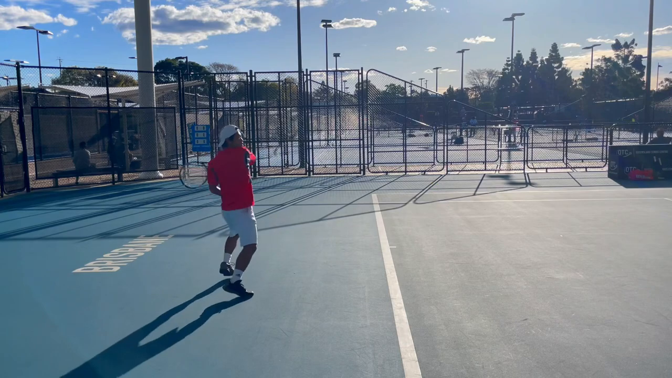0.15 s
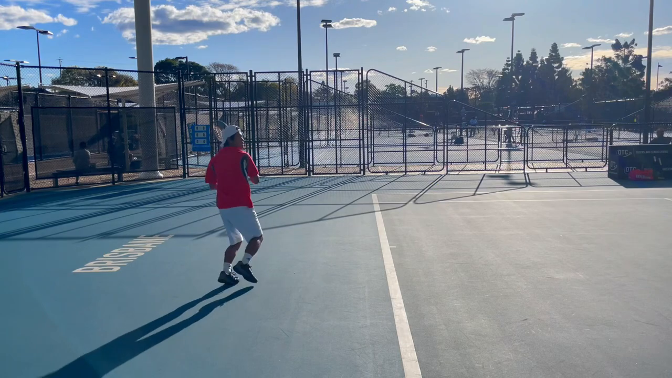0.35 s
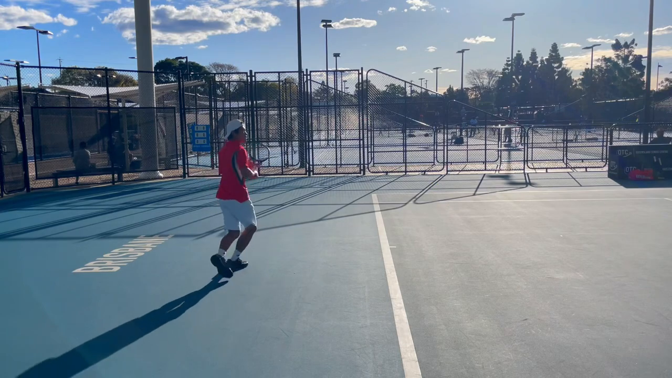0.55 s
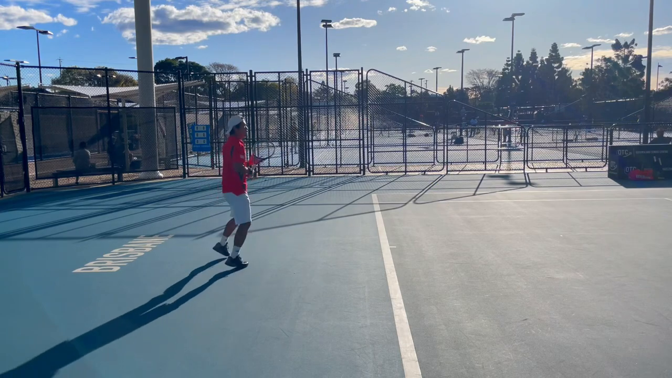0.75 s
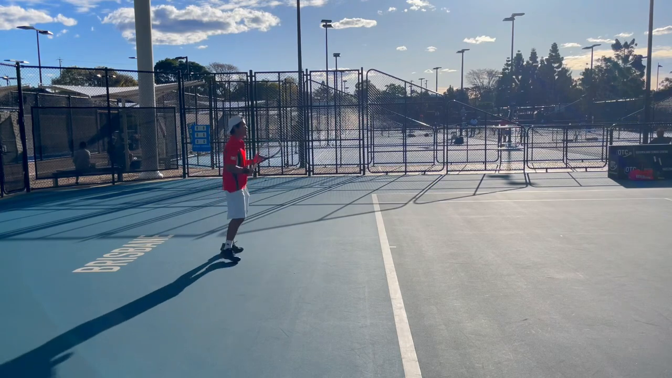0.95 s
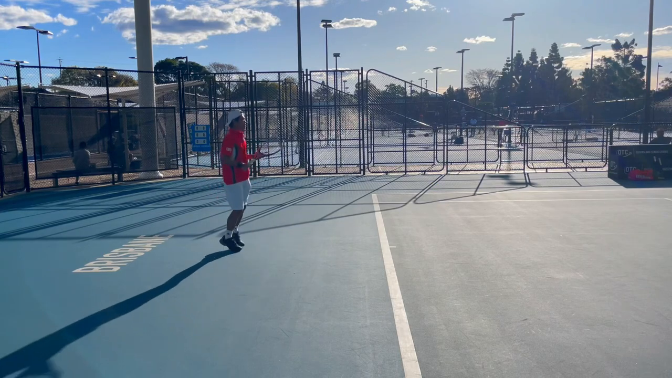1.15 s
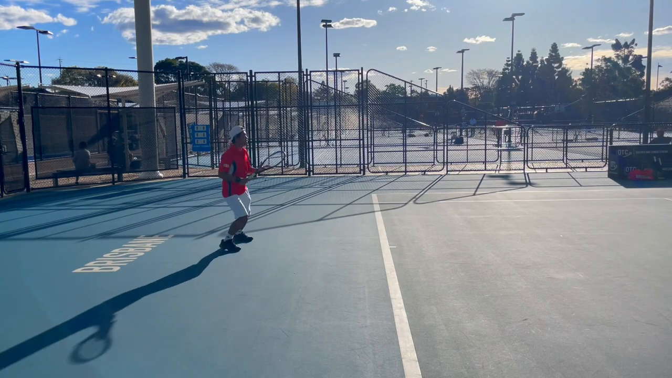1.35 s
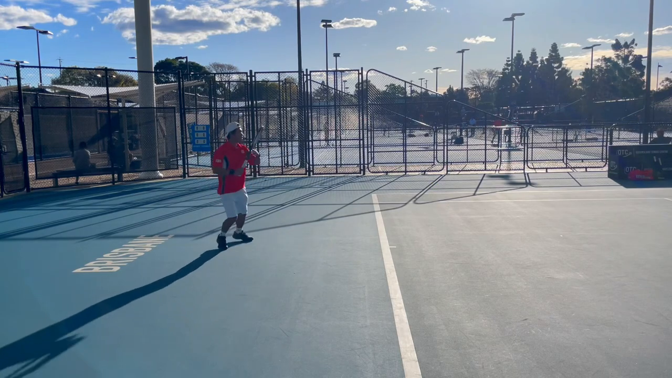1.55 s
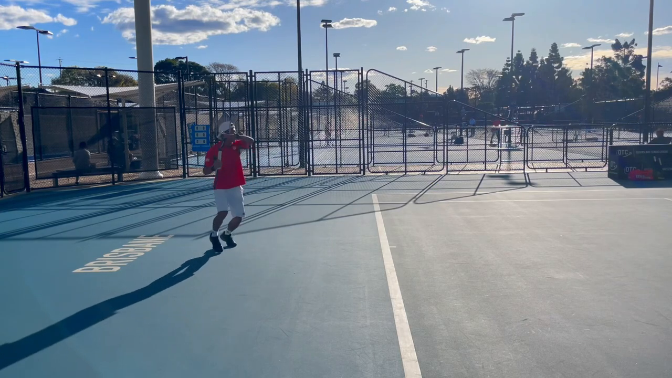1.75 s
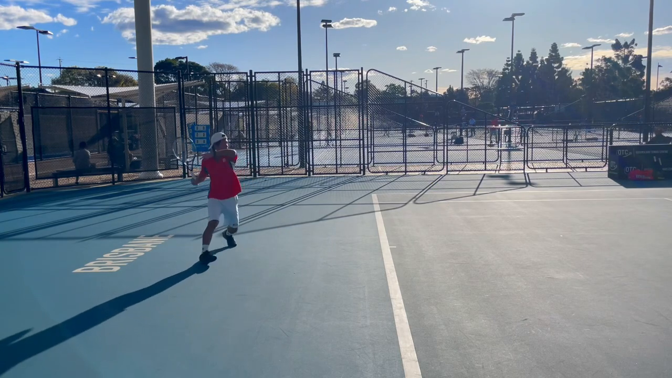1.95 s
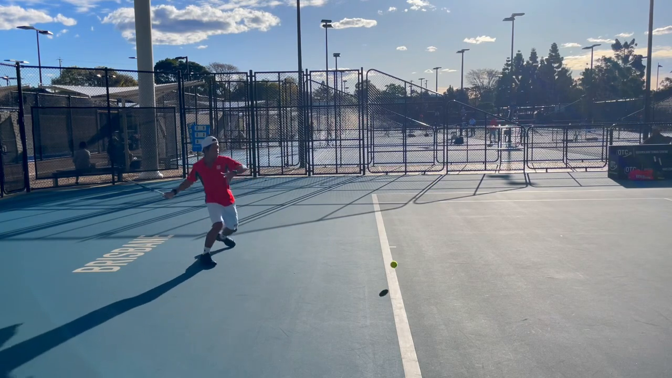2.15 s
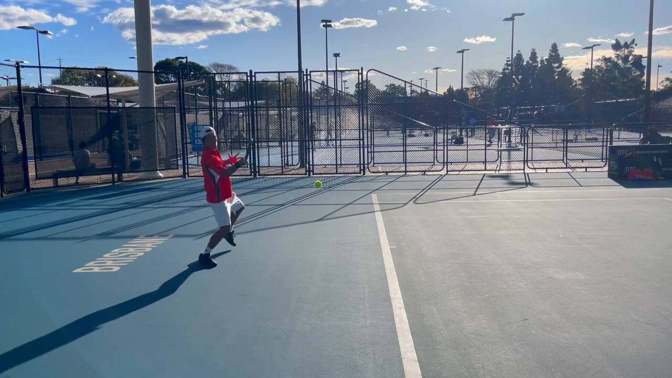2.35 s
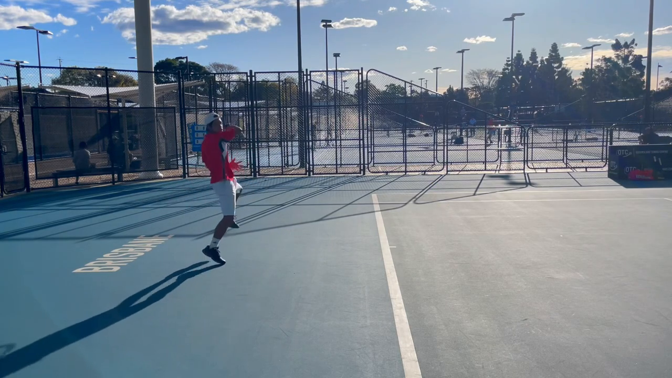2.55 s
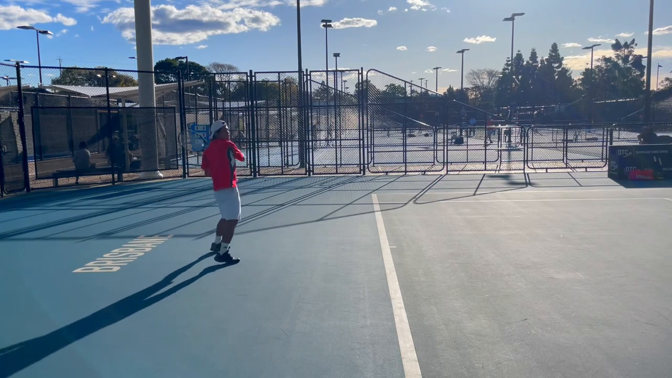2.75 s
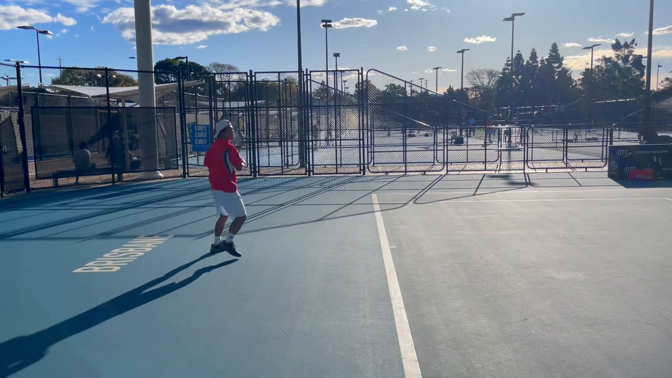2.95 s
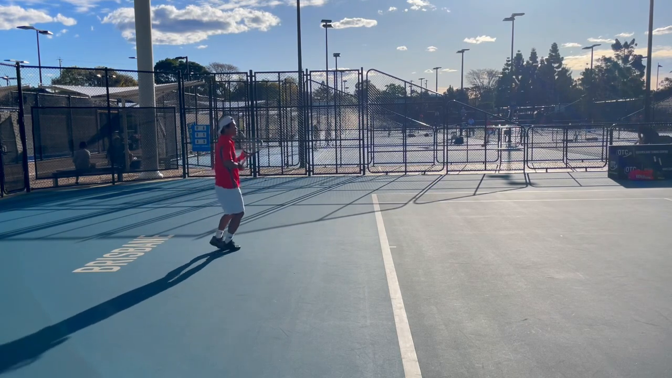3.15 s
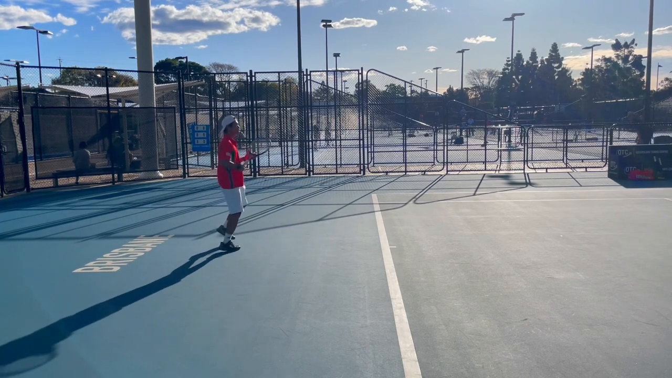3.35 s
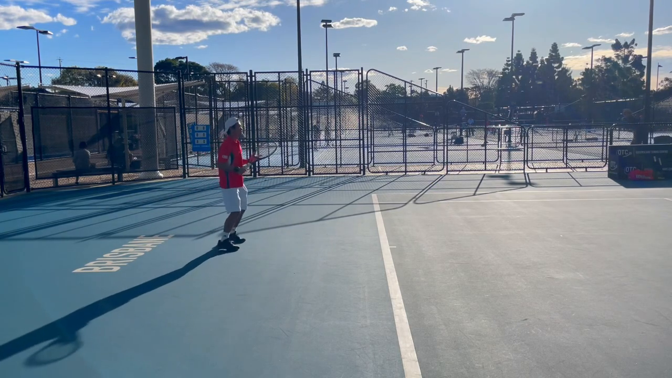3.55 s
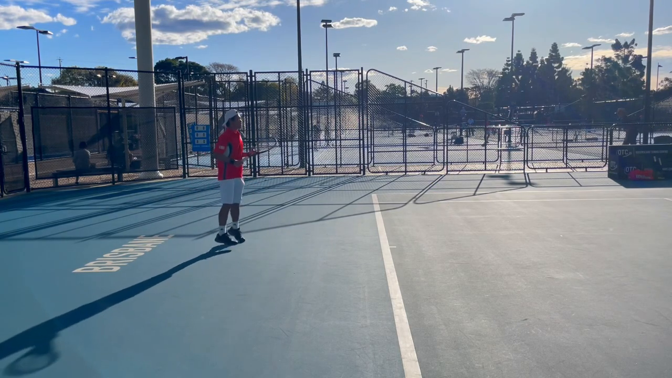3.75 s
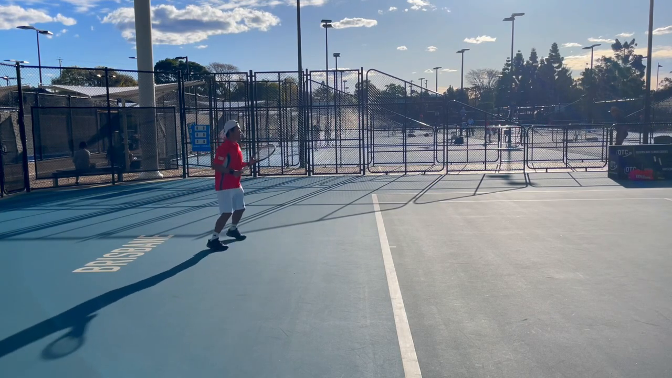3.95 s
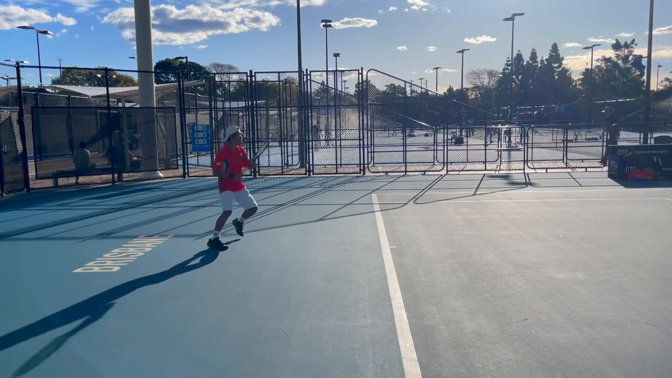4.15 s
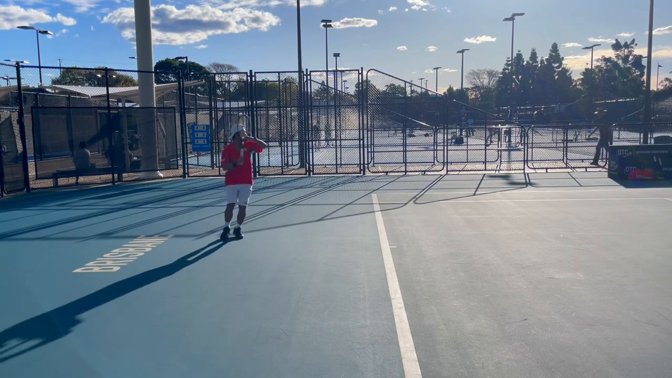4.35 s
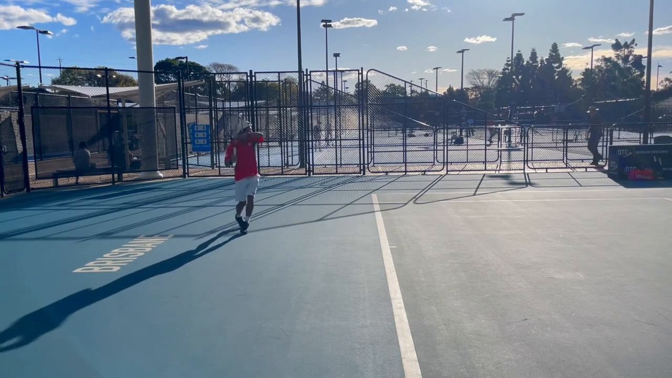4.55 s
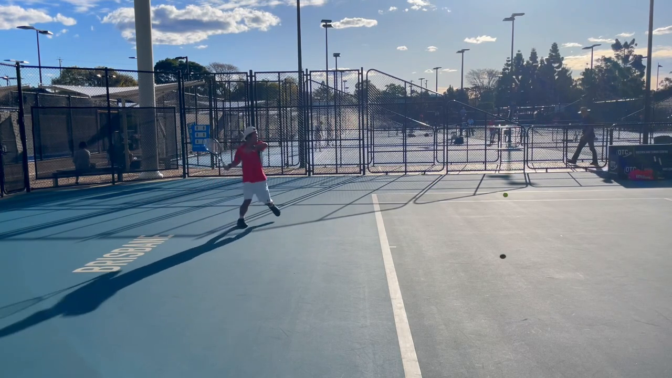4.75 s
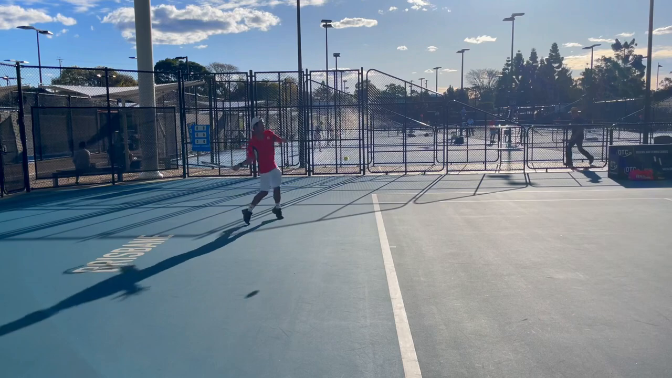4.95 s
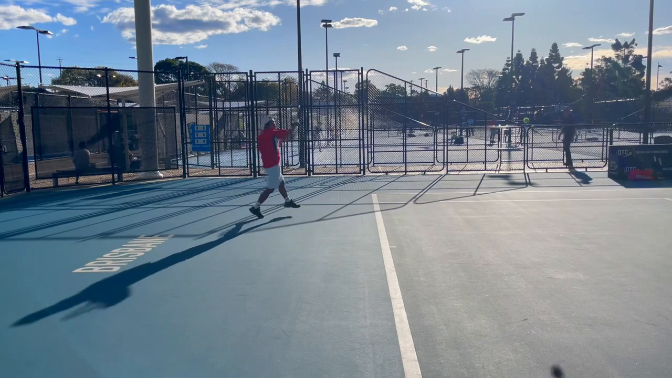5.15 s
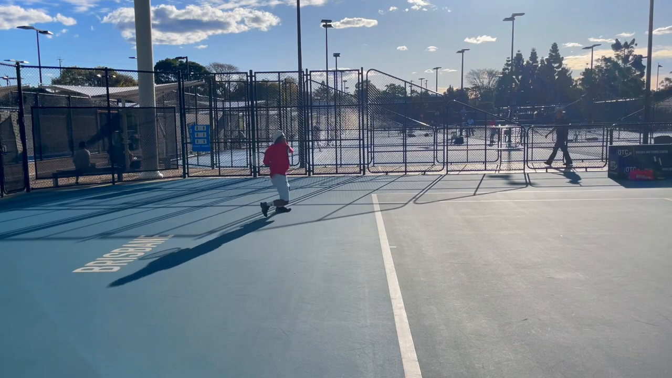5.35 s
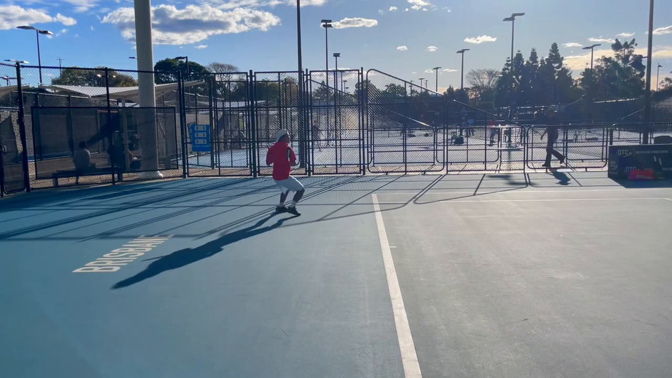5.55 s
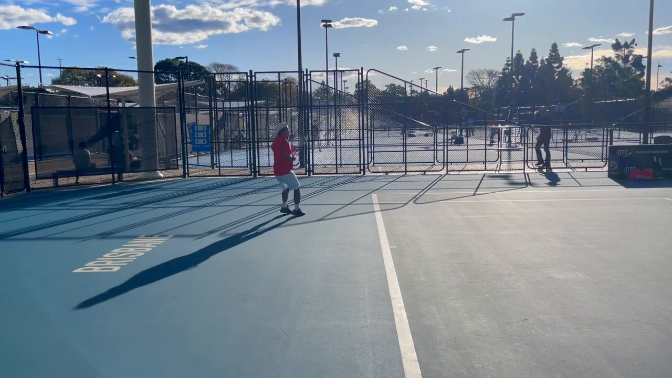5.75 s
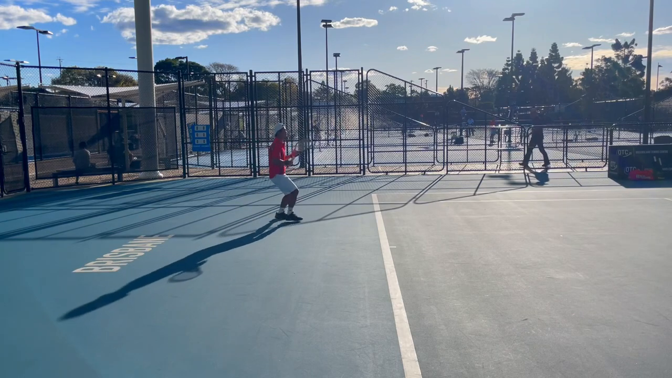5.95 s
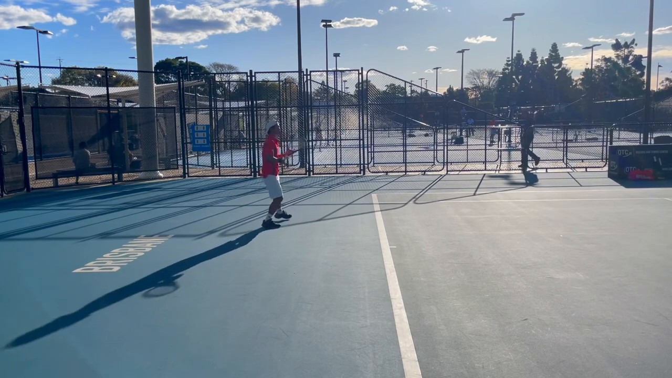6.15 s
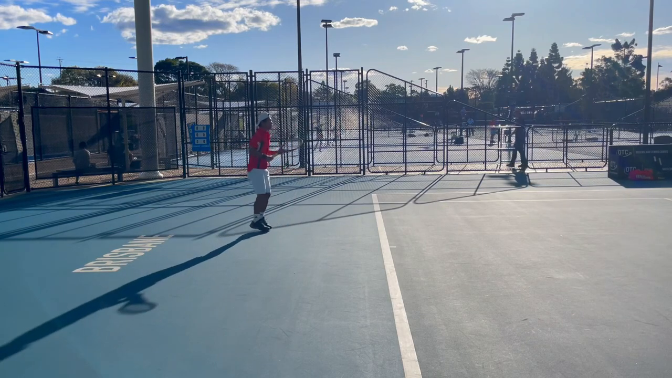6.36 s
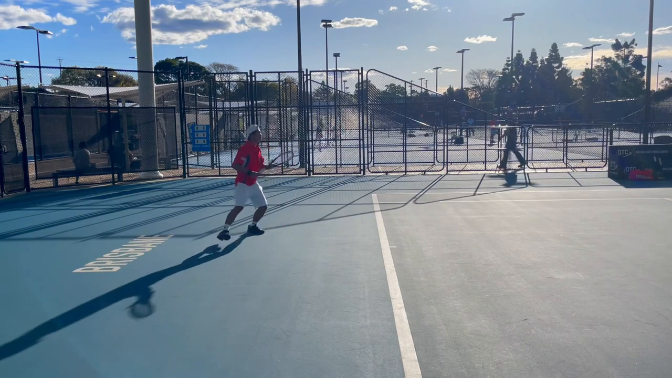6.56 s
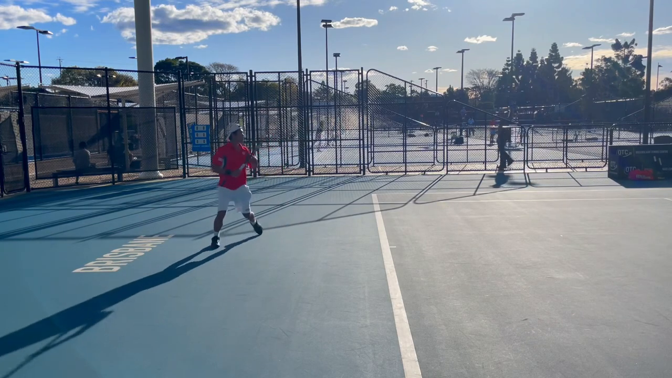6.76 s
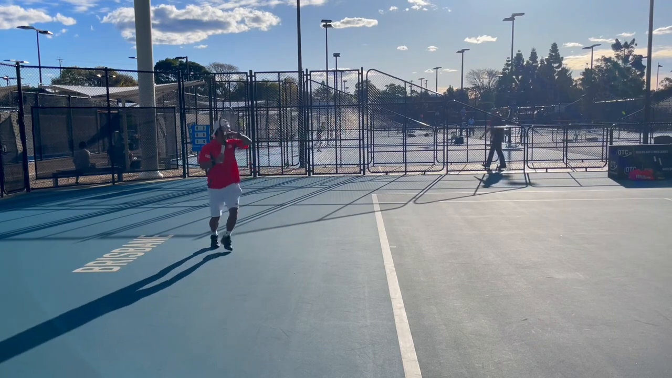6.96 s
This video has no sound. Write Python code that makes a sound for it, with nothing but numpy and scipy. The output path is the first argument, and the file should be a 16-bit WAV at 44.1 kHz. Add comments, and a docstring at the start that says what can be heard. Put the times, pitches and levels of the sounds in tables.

```python
"""First heard: echoes and tail of a near stroke made just before the start, over a low traffic rumble.
A tennis rally on an outdoor hard court follows, heard from a phone behind the near baseline.
Strokes are damped modes of ball and strings with a noise rasp; copies glance off the ground, slap back
from the structures around and linger in a diffuse noise tail. Bounces ring a hollow ball.
The near player's shoes thump (modes), scuff (grainy noise) and squeak (unsteady tones)."""
import sys
import numpy as np
from scipy import signal
from scipy.fft import rfft, irfft, next_fast_len
from scipy.io import wavfile

SR = 44100
rng = np.random.default_rng(int(sys.argv[2]) if len(sys.argv) > 2 else 0)


def dump(signal):
    """Clip the signal to [-1, 1] and save it as 16-bit WAV at the path in sys.argv[1]."""
    limited = np.clip(np.atleast_2d(signal).T, -1, 1)
    pcm = np.round(limited * 32767).astype(np.int16)
    wavfile.write(sys.argv[1], SR, pcm)


N = 309018
LEAD = SR // 2  # samples computed ahead of the start, for events that begin before it
TOTAL = N + LEAD

# Racket strokes. Each row: start in seconds, level in dB, ring pitch ratio, string ping in dB, ping in Hz,
# ping T60 in seconds, player's step away from the fence in m, share thrown to the surroundings in dB, court end.
STROKE_ROWS = [(-.222, -6, 1.0, -30, 2900, .02, 0.03, 0, "near"),
               (1.1422, -14, 1.05, -.5, 2850, .011, -0.05, 1.5, "far"),
               (2.3606, -6.3, 0.98, -24, 2950, .012, .6, -1.8, "near"),
               (3.8015, -14, 1.075, -27, 2170, .15, 0.016, 1, "far"),
               (5.1001, -6.5, 1.0, -25, 2550, .02, -.35, 1, "near"),
               (6.3568, -17.5, 1.09, -30, 2900, .015, -0.03, 3.5, "far")]
# Ball on each player's string bed. Each row: mode in Hz, level in dB, T60 in seconds.
NEAR_RACKET_MODES = [(185, 2.3, .0148), (630, -1, .016), (801, -2, .029), (990, -5.5, .04),
                     (1545, -9, .028), (1740, -16, .02), (2520, -18, .018), (3150, -17, .008),
                     (3900, -24, .01), (5400, -25, .008)]
FAR_RACKET_MODES = [(262, 4, 0.014), (450, -3.5, 0.014), (796, -2, 0.026), (990, 1.5, 0.012),
                    (1550, -7, 0.011), (1900, -8, 0.0054), (2465, -16, 0.0088)]
# Stroke by court end. Each entry: string rasp in dB, contact swell in seconds, direct treble shelf in dB,
# shelf corner in Hz, echo in dB, tail in dB.
STROKE_BY_END = {"near": (-17, .00082, 3, 1000, 0.4, -1), "far": (-15.5, .00063, -5.5, 650, -1.86, 6)}
# Delay of the reflection off the court behind the direct sound, by court end, in ms.
GROUND_DELAY_MS = {"near": 3.66, "far": 2.9}
# Lag of the left port behind the right, by court end, in ms.
LEFT_LAG_MS = {"near": -.06, "far": .36}
# Reflection off the court. Each row: frequency in Hz, gain in dB.
GROUND_GAIN = [(140, -5), (300, -1.5), (1200, -2), (4000, -9)]
# Treble lost on the way from the far end. Each row: frequency in Hz, gain in dB.
AIR_GAIN = [(4500, -1.5), (8000, -3), (13000, -14)]
# Felt rasping over strings. Each row: frequency in Hz, gain in dB.
RASP_GAIN = [(800, -2), (1600, 10.5), (3300, 1.5), (6000, -7), (8500, -5.5), (13000, -12), (16000, -18)]
# Broad knock that a near stroke throws sideways. Each row: frequency in Hz, gain in dB.
SIDEWAYS_GAIN = [(90, 5), (170, 22), (340, 32.5), (500, 29), (650, 23), (900, 24), (1150, 26), (1600, 15),
                 (2200, 15), (3000, 10.5), (6000, 0), (8500, -2), (13000, -4.5), (16000, -12)]
SIDEWAYS_RING_DB = -7  # share of the near racket's ring within that knock
SOUND_M_S = 343

# Ball bounces on this and nearby courts. Each row: start in seconds, level in dB, treble shelf in dB.
BOUNCE_ROWS = [(2.1664, -26, 10), (4.6955, -28.5, 8.5), (6.3204, -33, 15.5), (6.7622, -31.5, 9.5)]
# Hollow ball on hard ground. Each row: mode in Hz, level in dB, T60 in seconds.
BALL_MODES = [(282, 6, 0.017), (955, 2.5, 0.025), (1294, 4.5, 0.0032), (2700, 13, 0.0006)]
# Share of a bounce that the fence throws back. Each row: frequency in Hz, gain in dB.
BOUNCE_THROW_GAIN = [(250, -9), (700, -4), (1100, 3), (1700, 5), (3000, -2), (8000, -6)]
BOUNCE_TICK_DB, BOUNCE_TICK_DECAY_S = -19.5, 0.0018  # felt meeting grit, level against the knock
BOUNCE_STEP_M = 0.606  # the ball lands this much further from the fence than the player stands

# Low thumps: footfalls, and a few late echoes of strokes.
# Each row: start in seconds, thump in dB, gritty crunch in dB, thump pitch ratio.
THUMP_ROWS = [(0.225, -21, -39, 1.2), (0.275, -28, -46, 1), (1.006, -18.5, -40, 1.2), (2.17, -24, -54, .9),
              (2.267, -23, -42, 1.5), (2.603, -22, -48, 1.1), (2.745, -26, -46, 1), (2.962, -32, -48, 1),
              (3.485, -33, -43, 1.4), (5.609, -26, -49, 1), (5.698, -24, -47, 1), (6.148, -33, -45, 1),
              (6.76, -26, -52, 1)]
# Rubber sole on the court. Each row: mode in Hz, level in dB, T60 in seconds.
SOLE_MODES = [(209, 4, 0.015), (342, 1, 0.027), (607, 0, 0.011), (1357, -12, 0.03), (2605, -26, 0.065)]
# Sliding soles. Each row: start in seconds, length in seconds, hiss in dB, scrape in dB.
SCUFF_ROWS = [(.06, .09, -68, -64), (0.226, 0.022, -54, -49), (0.543, 0.0074, -54, -49.5),
              (.59, .06, -66, -62), (.858, .02, -59, -59), (.9, .05, -62, -60), (0.942, 0.066, -42, -56),
              (1.062, .016, -52, -58), (1.298, .014, -56, -54), (1.541, 0.026, -57, -60),
              (1.641, 0.047, -59.5, -53.5), (1.73, .03, -66, -62), (1.943, 0.007, -51.5, -58),
              (2.0, .09, -70, -68), (2.2, .09, -63, -62), (2.305, 0.051, -51.5, -53),
              (2.627, 0.053, -57, -52.5), (3.14, .03, -71, -62), (3.5, .02, -69, -60),
              (3.66, .03, -70, -68), (3.748, 0.0025, -50, -52), (4.07, .08, -69, -60),
              (4.339, 0.016, -53, -47), (4.37, .04, -63, -53), (4.59, .05, -64, -58),
              (4.85, .045, -72, -52), (4.932, 0.072, -48.5, -59), (5.288, .012, -58, -53),
              (5.613, 0.043, -58, -47), (5.912, .04, -65, -60), (6.1, 0.027, -51, -48),
              (6.2, .11, -67, -63), (6.455, .018, -62, -52), (6.8, 0.075, -51.5, -60)]
# Sole squeaks, and the echo of the one at 4.895 s.
# Each row: start in seconds, length in seconds, settled pitch in Hz, level in dB,
# pitch jitter as a share, sharp start as a share, tail in dB.
SQUEAK_ROWS = [(-.015, .033, 4296, -44, 0.048, .08, 1.5), (.272, .036, 4280, -51, .04, .05, -6),
               (.345, .018, 4310, -51, .03, .05, -8), (.592, .03, 3040, -46, 0.14, .08, 1),
               (0.625, .028, 2800, -46, 0.16, .08, 1), (.748, .028, 3000, -49, .12, .08, -3),
               (1.321, .03, 3290, -38.5, 0.034, .11, 2.5), (1.349, .036, 3320, -36, 0.03, .15, 1.5),
               (2.662, .018, 3250, -45, .05, .08, -10), (4.381, .014, 3450, -49, .05, .08, -8),
               (4.865, .036, 4200, -49, 0.05, .08, -3), (4.895, .02, 3350, -45, 0.01, .06, 2),
               (4.924, .034, 3365, -46, .012, .02, 3), (4.966, .02, 2700, -49, 0.03, .04, -6),
               (5.776, .033, 5130, -55, 0.05, .08, 4), (5.8, .025, 4050, -56, .07, .08, -5)]
# Relative spectra of fine grit, coarse scrape and crushed grit. Each row: frequency in Hz, gain in dB.
HISS_GAIN = [(1000, -35), (4500, -19), (7000, -7), (9000, -4), (11000, 0), (13000, .5), (14500, -1.5),
             (16000, -9)]
SCRAPE_GAIN = [(300, -2), (1500, 11), (3000, 7), (4500, 3), (7000, -2), (12000, -33)]
CRUNCH_GAIN = [(70, -32), (200, -10), (550, 0), (1100, -3), (2400, -15), (5000, -22), (8000, -36)]
CRUNCH_S = 0.012
SLIDE_RISE, SLIDE_RELEASE = 0.39, 0.42  # swell time and decay time as shares of a slide's length
# Light shuffling between the slides: mean rate, middling length and levels, level spread.
SHUFFLES_PER_S, SHUFFLE_S = 5, 0.05
SHUFFLE_HISS_DB, SHUFFLE_SCRAPE_DB, SHUFFLE_SPREAD_DB = -77, -66, 3.5
SQUEAK_SETTLE_S = 0.0055  # decay time of the sharp start
RADIATE_HZ = 110  # ball, racket and sole are too small to radiate bass below this

# Echoes of each court end and of a bounce.
# Each row: onset delay in seconds, swell time in seconds, level in dB, treble shelf in dB.
NEAR_ECHO_ROWS = [(.0295, .0145, -4.8, 0), (.052, .016, -15, -1), (.082, .017, -15, -2),
                  (.155, .025, -22, -3), (.362, .02, -18, -3), (.418, .02, -20.5, -4),
                  (.485, .022, -25, -4)]
FAR_ECHO_ROWS = [(.0205, .0095, .5, 0), (.04, .025, -11.5, 0), (.085, .025, -10.5, -1),
                 (.1455, .0135, -1.5, -1.5), (.204, .012, -8, -1), (.26, .018, -16, -4)]
BOUNCE_ECHO_ROWS = [(.038, .005, -7, -6), (.048, .004, -7, -6), (.095, .012, -16, -6)]
ECHO_CORNER_HZ = 1800  # the echoes' treble shelf starts here
# Spectra of the echoes and of the tail. Each row: frequency in Hz, gain in dB.
ECHO_GAIN = [(80, -41), (200, 2), (400, 4), (1000, 3), (2000, 1.5), (4500, 9), (8000, 1), (13000, -3),
             (16000, -4)]
TAIL_GAIN = [(50, -8), (100, -1.5), (200, -5.5), (400, 3.5), (800, -2), (1300, 0), (2200, 1.5), (4500, 7),
             (8000, 3), (13000, -6), (15000, -11)]
# Tail decay. Each row: frequency in Hz, T60 in seconds.
TAIL_DECAY = [(100, 2), (500, 2.6), (1500, 2.6), (3400, 2), (7000, 1.35), (14000, .8)]
# Likeness of the two ports in diffuse sound. Each row: frequency in Hz, correlation.
PORT_CORRELATION = [(50, 0.75), (180, 0.95), (350, 0.37), (800, 0.017), (2000, 0.035), (5000, 0.014)]

# Distant town, relative spectrum. Each row: frequency in Hz, density in dB per Hz.
TOWN_DENSITY = [(13, -79), (22, -13), (64, -2.5), (125, -6), (194, -11.5), (236, -6.5), (294, -11.5),
                (496, -15), (815, -17), (1040, -17), (1380, -23), (3320, -37.5), (4030, -42), (7000, -53),
                (9500, -65), (14000, -65), (16000, -76)]
TOWN_DB = -40
# Distant engine easing off and picking up again. Each row: time in seconds, firing rate in Hz, level in dB.
ENGINE_ROWS = [(4.4, 65, -54), (4.68, 63.3, -41.5), (5.45, 56.4, -38.5), (5.85, 51.1, -45),
               (6.252, 56.9, -39), (7, 57.3, -42.5)]

# The phone's body shading the right port. Each row: frequency in Hz, gain in dB.
RIGHT_SHADE_GAIN = [(1800, 0), (2600, -.7), (4000, -4), (5500, -4.5)]
# Treble phase between the channels. Each row: frequency in Hz, phase in radians.
CHANNEL_PHASE = [(5000, 0), (6800, 1.8), (8200, 3), (9400, 2.6), (10500, 1.3), (12000, .5), (14000, 0)]
TOP_HZ = 15900


def strokes(rasp_lead_s=0.0019, pan_db=3.0):
    """Felt rasps over the strings, then ball and string bed pop; ground and surroundings send copies."""
    ports, tail_send = np.zeros((2, TOTAL)), np.zeros(TOTAL)
    t = seconds(count=4096)
    lead = int(rasp_lead_s * SR)
    for s, db, ratio, ping_db, ping_hz, ping_t60_s, step_m, around_db, end in STROKE_ROWS:
        rasp_db, contact_s, shelf_db, corner_hz, echo_db, tail_db = STROKE_BY_END[end]
        far = end == "far"
        lag_ms = LEFT_LAG_MS[end]
        start_s = s - rasp_lead_s

        pop = ring(FAR_RACKET_MODES if far else NEAR_RACKET_MODES, contact_s, ratio)
        pop = pop + ring([(ping_hz, ping_db, ping_t60_s)], contact_s=0.0018)
        pop = np.roll(pop, lead)
        rasp = colour(cluster(t * np.exp(-t / 0.0021)), RASP_GAIN)
        rasp = rasp * np.sqrt(0.005 * SR)  # about rms 1 while it lasts, before colouring
        hit = undb(db) * (pop + undb(rasp_db) * rasp)
        if far:
            hit = colour(hit, AIR_GAIN)

        direct = tilt(hit, shelf_db, corner_hz)
        add_direct(ports, direct, start_s, lag_ms, pan_db)
        glance = colour(direct, GROUND_GAIN)
        add_direct(ports, glance, start_s + GROUND_DELAY_MS[end] / 1000, lag_ms, pan_db)

        if not far:  # the surroundings receive a broader knock
            knock = np.roll(cluster(t * np.exp(-t / 0.0015)), lead)
            hit = undb(db) * (undb(SIDEWAYS_RING_DB) * pop + colour(knock, SIDEWAYS_GAIN))
        response = slap_response(FAR_ECHO_ROWS if far else NEAR_ECHO_ROWS, lag_ms)
        detour_s = 2 * step_m / SOUND_M_S
        for port, echo, side_db in zip(ports, convolve(hit, response), (1.2, -1.2)):
            add(port, echo * undb(echo_db + around_db + side_db), start_s + detour_s)
        add(tail_send, hit * undb(tail_db + around_db), start_s)
    return ports, tail_send


def bounces(send_db=-1.0):
    """The hollow ball knocks on the hard court, with a tick of felt on grit."""
    ports, send = np.zeros((2, TOTAL)), np.zeros(TOTAL)
    t = seconds(count=4096)
    for s, db, shelf_db in BOUNCE_ROWS:
        tick = unit(colour(rng.standard_normal(len(t)), HISS_GAIN)) * np.exp(-t / BOUNCE_TICK_DECAY_S)
        knock = tilt(ring(BALL_MODES, contact_s=0.00033), shelf_db)
        knock = undb(db) * (knock + undb(BOUNCE_TICK_DB) * tick)
        add_direct(ports, knock, s, lag_ms=0, pan_db=1.0)
        add(send, knock * undb(send_db), s + 2 * BOUNCE_STEP_M / SOUND_M_S)
    return ports, send


def shoes(thump_send_db=-5, scuff_send_db=-5):
    """Thumps, scuffs and squeaks of the near player, left of the microphone, with a few echoes among them."""
    thumps, scuffs, squeaks, squeak_send = np.zeros((4, TOTAL))
    for s, db, crunch_db, ratio in THUMP_ROWS:
        crunch = burst(CRUNCH_GAIN, CRUNCH_S, grain_db=4.0, count=4096)
        add(thumps, undb(crunch_db) * crunch, s)
        add(thumps, undb(db) * ring(SOLE_MODES, contact_s=0.0025, ratio=ratio), s)
    for s, length_s, pitch_hz, db, jitter, overshoot, tail_db in SQUEAK_ROWS:
        chirp = undb(db) * squeak(length_s, pitch_hz, jitter, overshoot)
        add(squeaks, chirp, s)
        add(squeak_send, undb(tail_db) * chirp, s)
    for s, length_s, hiss_db, scrape_db in SCUFF_ROWS + shuffles():
        add(scuffs, scuff(length_s, hiss_db, scrape_db), s)
    ports = np.zeros((2, TOTAL))
    add_direct(ports, thumps + scuffs + squeaks, -LEAD / SR, lag_ms=-0.45, pan_db=5)
    foot_send = undb(thump_send_db) * thumps + undb(scuff_send_db) * scuffs
    return ports, foot_send, squeak_send


def squeak(length_s, pitch_hz, jitter, overshoot, overtone_db=-25):
    """Stick-slip of rubber: the pitch drops and settles, unsteadily, as the sole grips."""
    t = seconds(count=4096)
    glide = 1 + overshoot * np.exp(-t / SQUEAK_SETTLE_S)
    hz = pitch_hz * glide * (1 + jitter * walk(1190, len(t)))
    phase = 2 * np.pi * np.cumsum(hz) / SR
    arch = np.sqrt(np.abs(np.sin(np.pi * np.minimum(t / length_s, 1))))
    flutter = undb(2.2 * walk(370, len(t)))
    return arch * flutter * (np.sin(phase) + undb(overtone_db) * np.sin(2 * phase))


def scuff(length_s, hiss_db, scrape_db):
    """A sliding sole: smooth hiss of fine grit over a coarser, grainier scrape."""
    hiss = burst(HISS_GAIN, length_s, grain_db=2.0, count=12288)
    scrape = burst(SCRAPE_GAIN, length_s, grain_db=5.5, count=12288)
    return undb(hiss_db) * hiss + undb(scrape_db) * scrape


def shuffles():
    """Light foot adjustments at loosely even, random moments: rows like those of SCUFF_ROWS."""
    slots = np.arange(int(SHUFFLES_PER_S * N / SR))
    when, length, strength = rng.uniform(-1.1, 1, (len(slots), 3)).T
    start_s = (slots + 0.5 + when / 2) / SHUFFLES_PER_S
    length_s = SHUFFLE_S * 2 ** length
    db = SHUFFLE_SPREAD_DB * strength
    return list(zip(start_s, length_s, SHUFFLE_HISS_DB + db, SHUFFLE_SCRAPE_DB + db))


def ring(modes, contact_s, ratio=1):
    """Damped modes of alternating sign, swelling over the contact; so small a body radiates little bass."""
    t = seconds(count=4096)
    motion = np.zeros(len(t))
    for k, (hz, db, t60_s) in enumerate(modes):
        decay = np.exp(-np.log(1000) * t / t60_s)
        motion += (-1) ** k * undb(db) * np.sin(2 * np.pi * hz * ratio * t) * decay
    swell = 1 - np.exp(-(t / contact_s) ** 2)
    return highpass(swell * motion, RADIATE_HZ, order=2)


def burst(points, length_s, grain_db, count):
    """Grainy friction noise that swells, holds while the slide lasts and dies away."""
    t = seconds(count)
    grains = rng.standard_normal(count) * undb(grain_db * walk(848, count))
    rise = np.minimum(t / (SLIDE_RISE * length_s), 1)
    release = np.exp(-np.maximum(t - length_s, 0) / (SLIDE_RELEASE * length_s))
    return unit(colour(grains, points)) * rise * release


def cluster(envelope):
    """A spray of tiny clicks under an envelope, nearly even in spectrum, with unit energy."""
    x = rng.standard_normal(len(envelope)) * envelope
    for _ in range(12):  # alternately flatten the spectrum and restore the envelope
        flat = irfft(np.exp(1j * np.angle(rfft(x))), len(x))
        x = flat * (envelope / envelope.max()) ** 0.25
    return x / np.sqrt(np.sum(x ** 2))


def slap_response(echoes, lag_ms, scatter=1.3):
    """Each echo is a cluster of small reflections: one part shared by the ports, one part their own."""
    t = seconds(count=4096)
    response = np.zeros((2, 28000))
    for delay_s, swell_s, db, shelf_db in echoes:
        age = t / swell_s
        envelope = age * np.exp(-age ** 2 / 2)
        aimed, left, right = (tilt(cluster(envelope), shelf_db, ECHO_CORNER_HZ) for _ in range(3))
        lagged = np.roll(aimed, int(lag_ms * SR / 1000))
        ports = np.array([lagged + scatter * left, aimed + scatter * right])
        i = int(delay_s * SR)
        response[:, i:i + len(t)] += undb(db) * ports / np.hypot(1, scatter)
    return colour(response, ECHO_GAIN)


def tail(x, level_db, build_s=0.021):
    """Diffuse ring of the surroundings, arriving in lumps; the air takes the treble first."""
    t = seconds(count=98304)
    spectrum, f = rfft(diffuse(len(t))), freqs(t)
    centres_hz, t60s_s = np.transpose(TAIL_DECAY)
    response = np.zeros((2, len(t)))
    for share, t60_s in zip(np.eye(len(centres_hz)), t60s_s):  # overlapping bands that sum to one
        band = irfft(spectrum * along(np.column_stack([centres_hz, share]), f))
        response += band * np.exp(-np.log(1000) * t / t60_s)
    lumps = undb(2.3 * walk(55, len(t)))
    build = 1 - np.exp(-(t / build_s) ** 2)
    return convolve(x, colour(response * lumps * build, TAIL_GAIN)) * undb(level_db)


def town():
    """Far traffic as gently swelling noise, with one engine's tone joining in late on."""
    wash = unit(colour(diffuse(next_fast_len(N)), TOWN_DENSITY))[:, :N]
    wash = wash * undb(TOWN_DB + 1.2 * walk(3.31, N))
    s, hz, db = np.transpose(ENGINE_ROWS)
    t = seconds(N)
    firing_hz = np.interp(t, s, hz) * (1 + 0.015 * walk(12, N))
    phase = 2 * np.pi * np.cumsum(firing_hz) / SR
    fade_in = np.clip(t - s[0] + 1, 0, 1)  # over the second before the first row
    drone = np.sin(phase) * undb(np.interp(t, s, db) + 2.0 * walk(18, N)) * fade_in
    return highpass(wash + drone, 35, order=6)


def diffuse(count):
    """Noise from all around: alike at both ports in the bass, nearly unrelated higher up."""
    noise = rng.standard_normal((2, count))
    c = along(PORT_CORRELATION, freqs(noise))
    mid, side = irfft(rfft(noise) * np.sqrt([(1 + c) / 2, (1 - c) / 2]), count)
    return np.array([mid + side, mid - side])


def undb(db):
    """Decibels to gain."""
    return 10 ** (np.asarray(db) / 20)


def unit(x):
    """Scale to rms 1."""
    return x / np.sqrt(np.mean(x ** 2))


def seconds(count):
    """Time axis of count samples."""
    return np.arange(count) / SR


def freqs(x):
    """Frequencies in Hz of the spectrum of x."""
    return np.fft.rfftfreq(x.shape[-1], 1 / SR)


def along(points, hz):
    """Read (Hz, value) points on a log-frequency axis."""
    f, value = np.transpose(points)
    return np.interp(np.log(np.maximum(hz, 1)), np.log(f), value)


def colour(x, points):
    """Filter by a (Hz, dB) spectrum."""
    return irfft(rfft(x) * undb(along(points, freqs(x))), x.shape[-1])


def tilt(x, shelf_db, corner_hz=900):
    """Shelve the treble up or down over the octave above a corner."""
    octaves = np.clip(np.log2(np.maximum(freqs(x), 1) / corner_hz), 0, 1)
    return irfft(rfft(x) * undb(shelf_db * octaves), len(x))


def highpass(x, corner_hz, order):
    """Butterworth bass cut."""
    return signal.sosfilt(signal.butter(order, corner_hz, "highpass", fs=SR, output="sos"), x)


def walk(knots_per_s, count):
    """Random wander, straight between normal-distributed knots."""
    knots = rng.standard_normal(count // 20 + 2)
    return np.interp(seconds(count) * knots_per_s, np.arange(len(knots)), knots)


def add(track, x, s):
    """Mix x into a track at time s."""
    i = max(int(round(s * SR)) + LEAD, 0)
    track[i:i + len(x)] += x[:TOTAL - i]


def add_direct(ports, x, s, lag_ms, pan_db):
    """Mix x into both ports, the left one lagging by lag_ms and louder by pan_db."""
    add(ports[0], x * undb(pan_db / 2), s + lag_ms / 1000)
    add(ports[1], x * undb(-pan_db / 2), s)


def convolve(x, response):
    """Play a mono track through a two-port response."""
    return signal.fftconvolve(x[None], response, axes=1)[:, :TOTAL]


def scene(surround_pan_db=3.5):
    """Direct sounds, their echoes, the tail and the town."""
    hits, hit_send = strokes()
    knocks, knock_send = bounces()
    feet, foot_send, squeak_send = shoes()
    around = convolve(foot_send, slap_response(NEAR_ECHO_ROWS, lag_ms=-0.13))
    thrown = colour(knock_send, BOUNCE_THROW_GAIN)
    around = around + convolve(thrown, slap_response(BOUNCE_ECHO_ROWS, lag_ms=-0.13))
    around = around + tail(hit_send + knock_send + foot_send + squeak_send, level_db=-42.5)
    pan = undb(np.array([[surround_pan_db], [-surround_pan_db]]) / 2)
    return (hits + knocks + feet)[:, LEAD:] + pan * (around[:, LEAD:] + town())


def record(dry):
    """In the top octaves both channels carry the left port, turned in phase; peaks round, extremes are cut."""
    left, right = rfft(dry, 2 * N)
    f = np.fft.rfftfreq(2 * N, 1 / SR)
    shared = along([(5200, 0.016), (7200, 1)], f)  # power share of the left port in the right channel
    own = right * undb(along(RIGHT_SHADE_GAIN, f))
    turned = left * np.exp(-1j * along(CHANNEL_PHASE, f))
    right = np.sqrt(1 - shared) * own + np.sqrt(shared) * turned
    both = np.tanh(irfft(np.array([left, right]))[:, :N])
    both = highpass(both, 35, order=4)
    return signal.sosfilt(signal.ellip(10, 0.2, 80, TOP_HZ, fs=SR, output="sos"), both)


dry = scene()
out = record(dry)
dump(out)
```